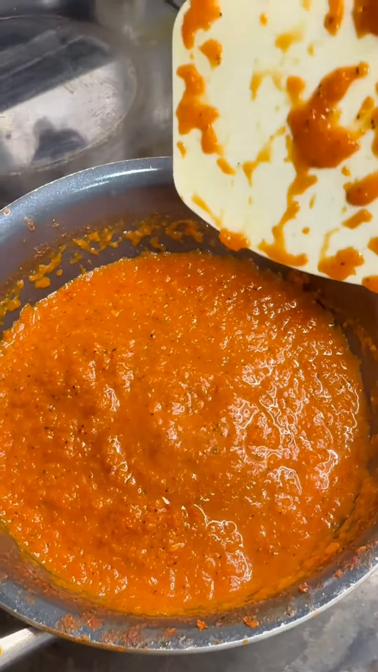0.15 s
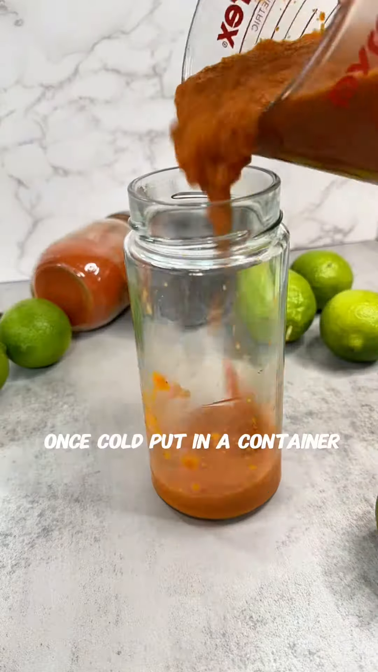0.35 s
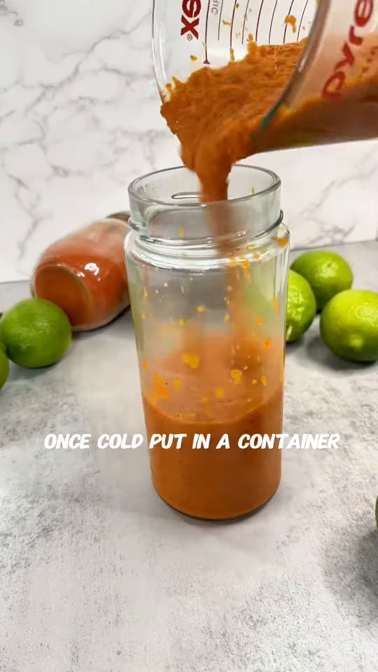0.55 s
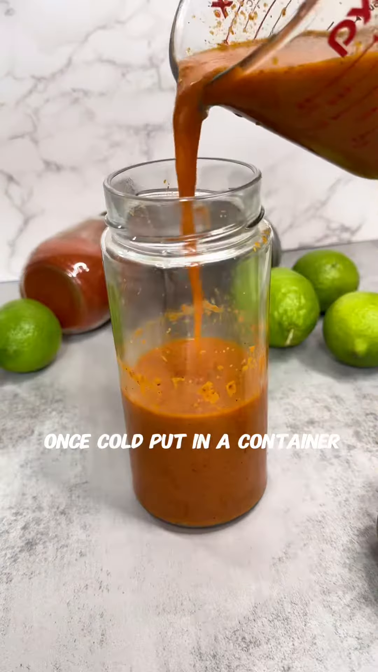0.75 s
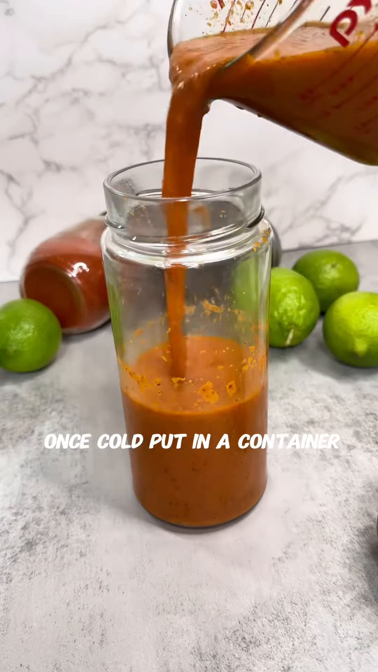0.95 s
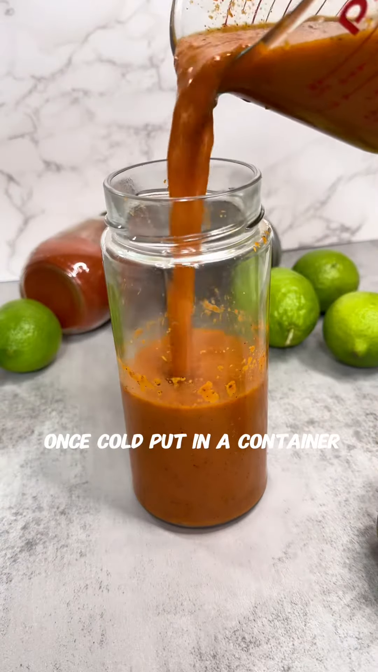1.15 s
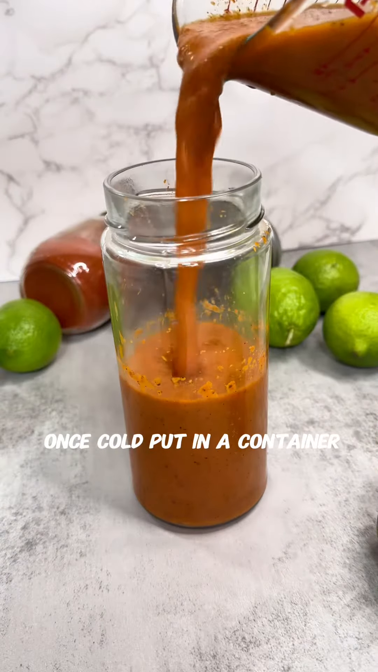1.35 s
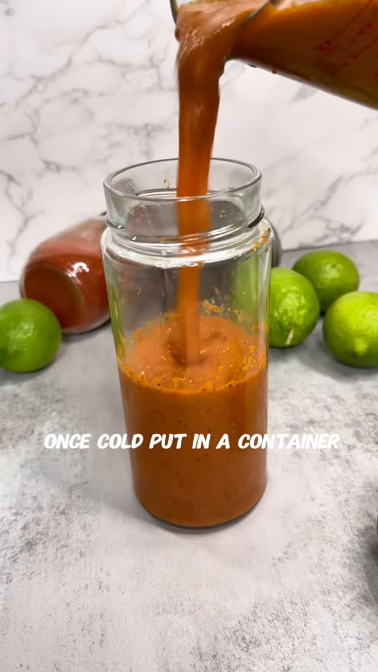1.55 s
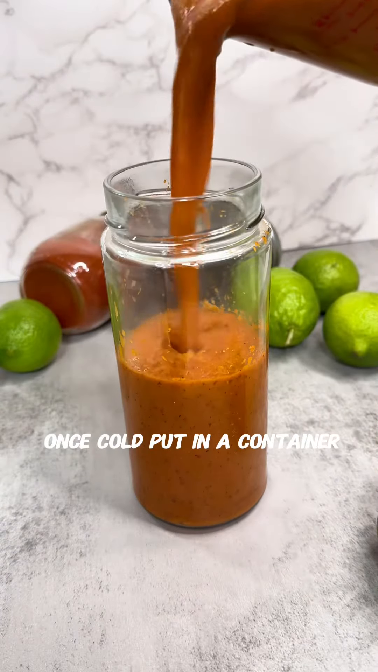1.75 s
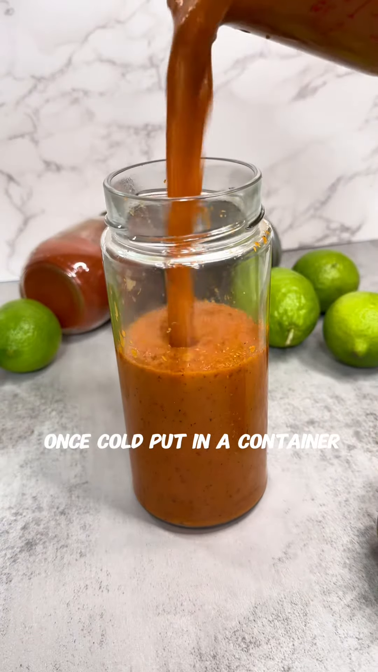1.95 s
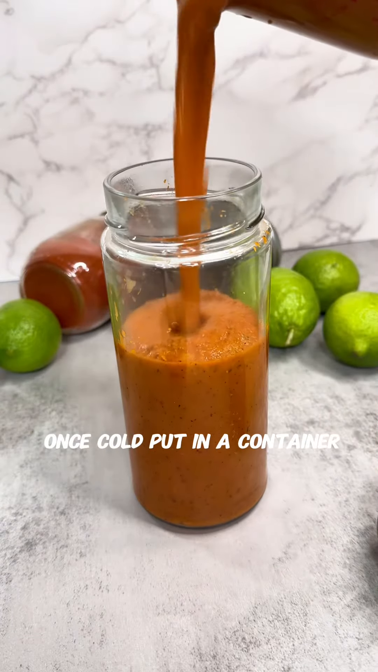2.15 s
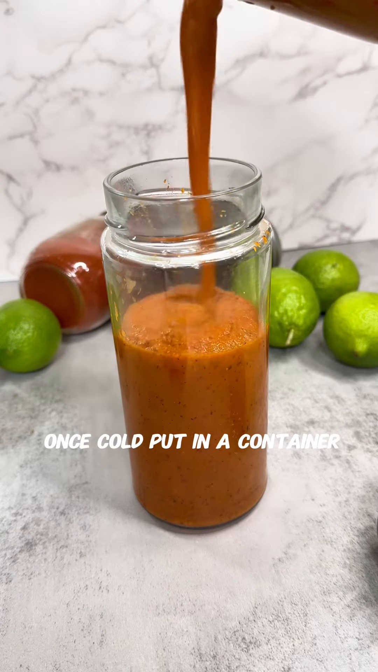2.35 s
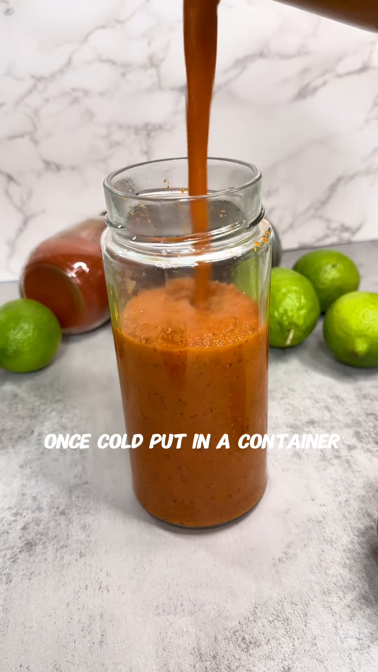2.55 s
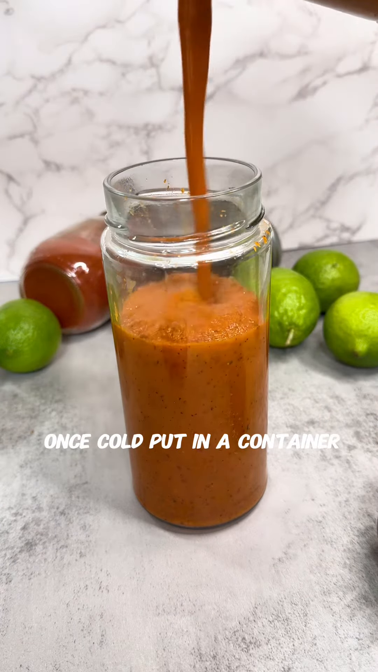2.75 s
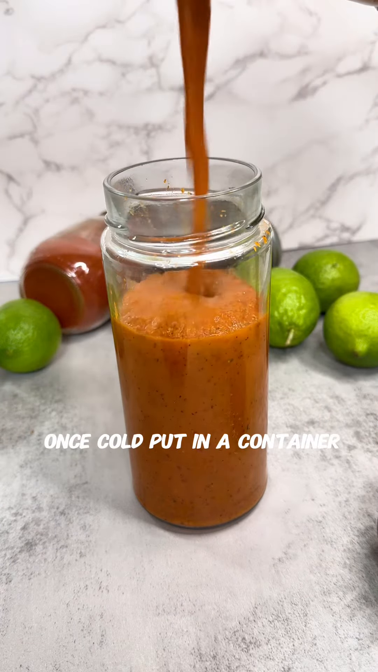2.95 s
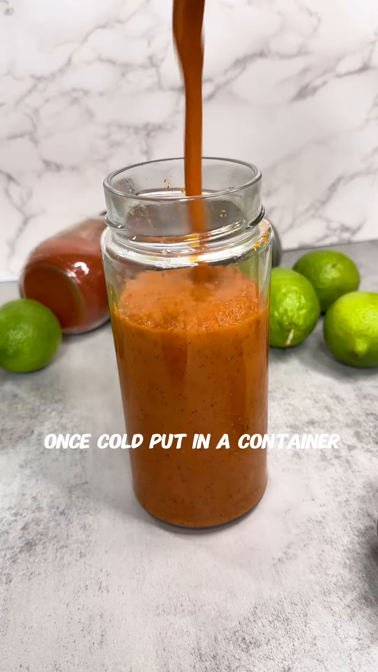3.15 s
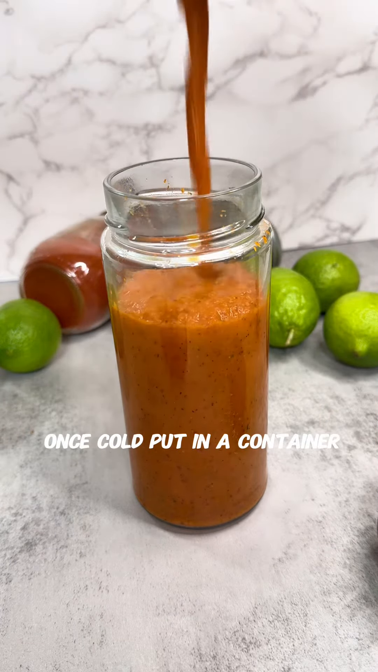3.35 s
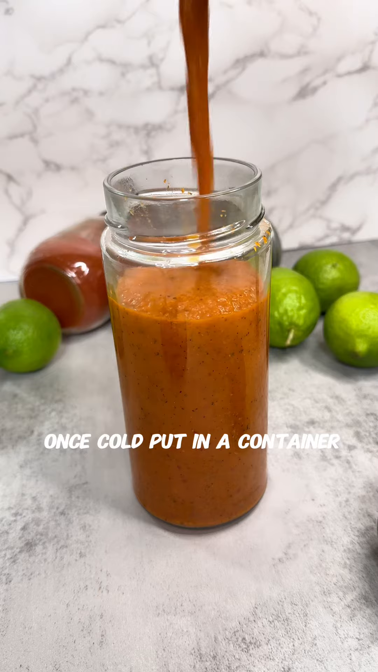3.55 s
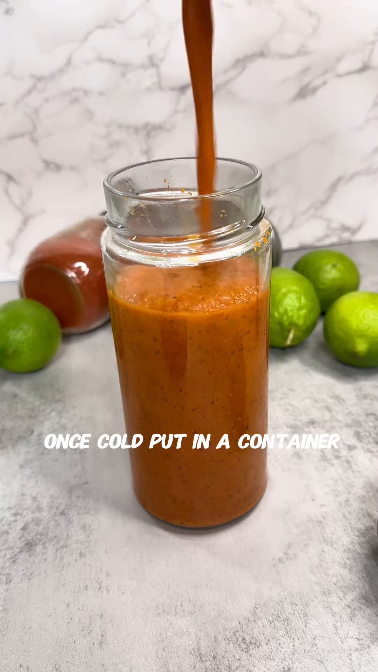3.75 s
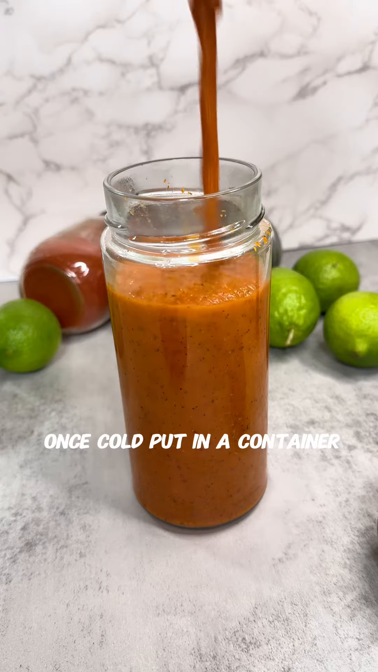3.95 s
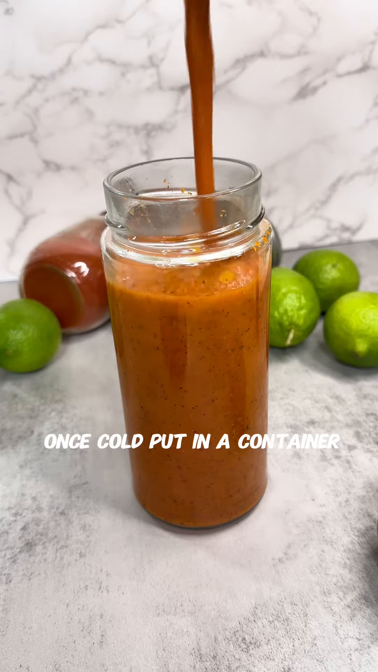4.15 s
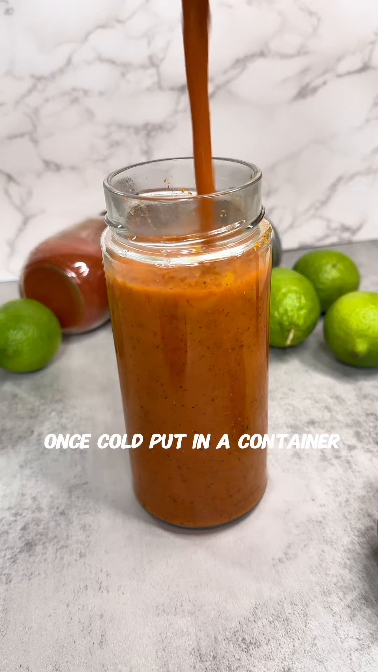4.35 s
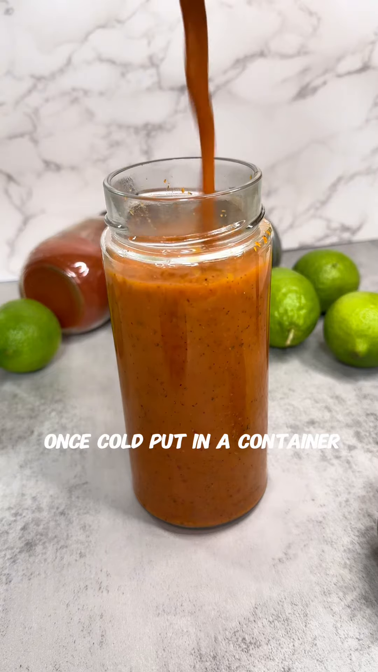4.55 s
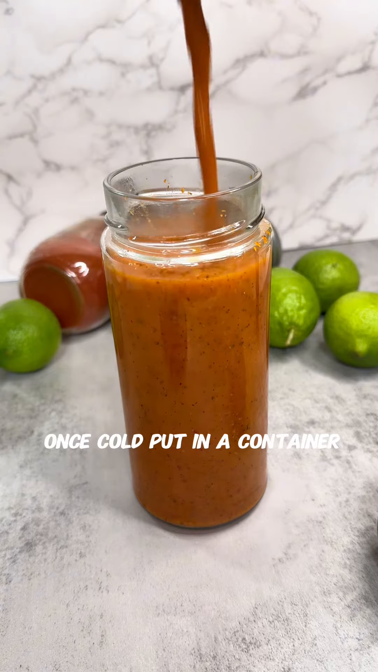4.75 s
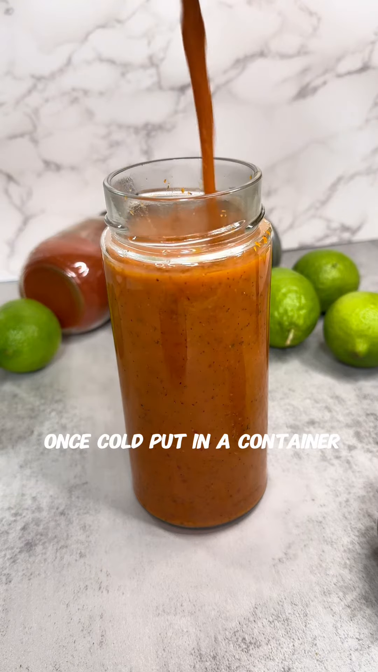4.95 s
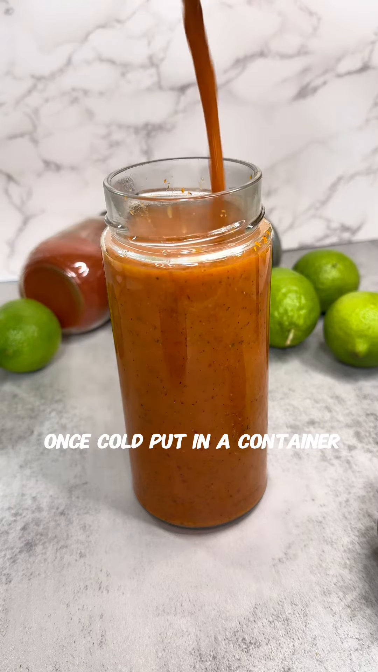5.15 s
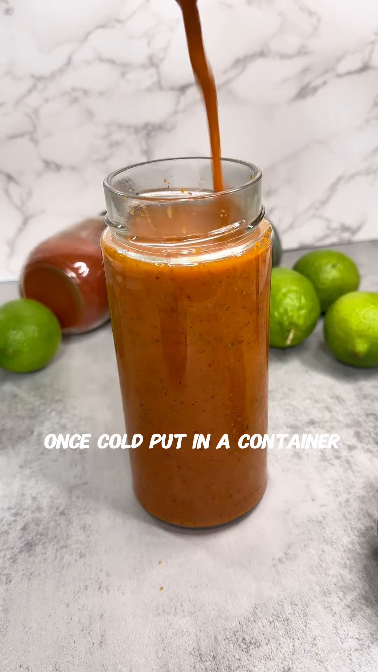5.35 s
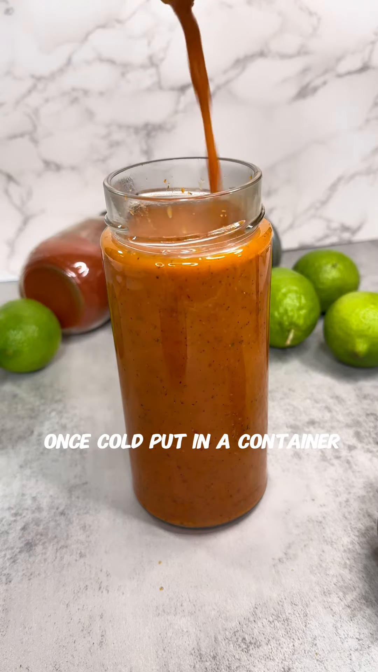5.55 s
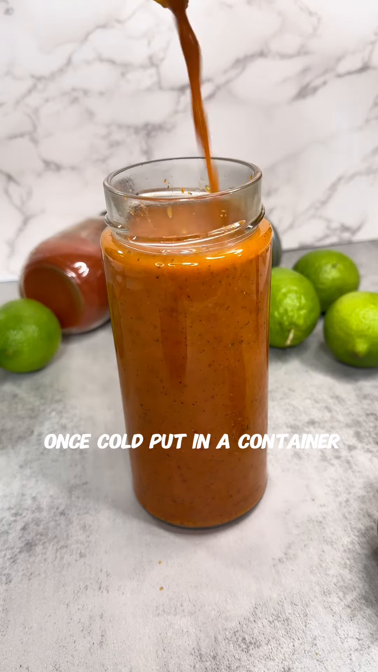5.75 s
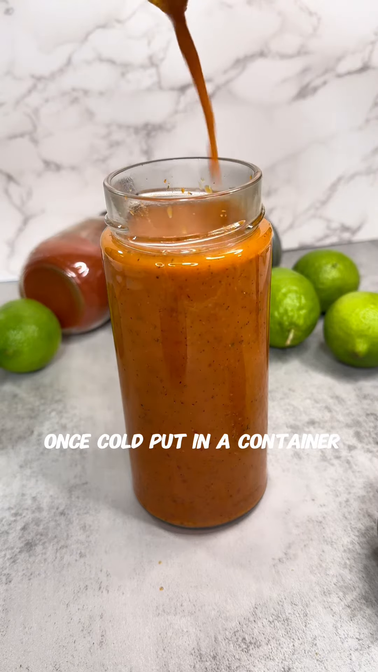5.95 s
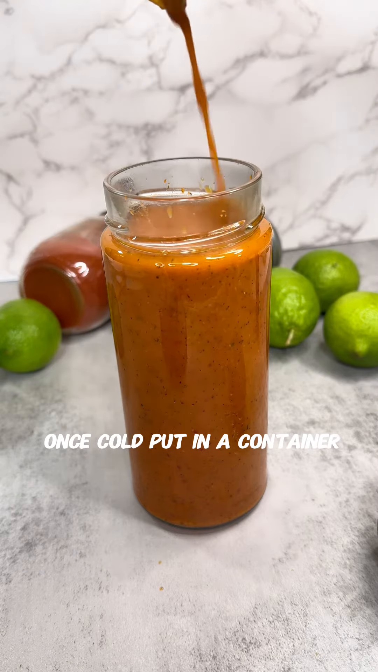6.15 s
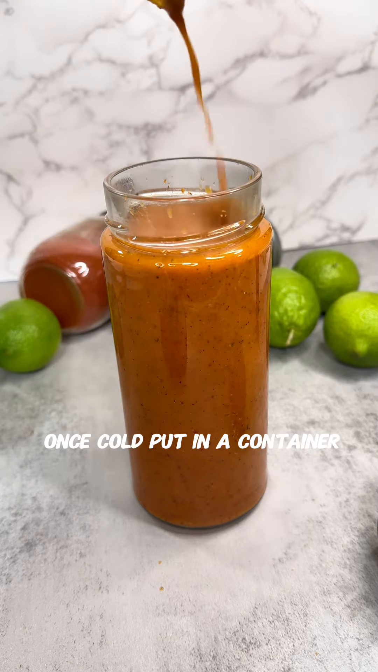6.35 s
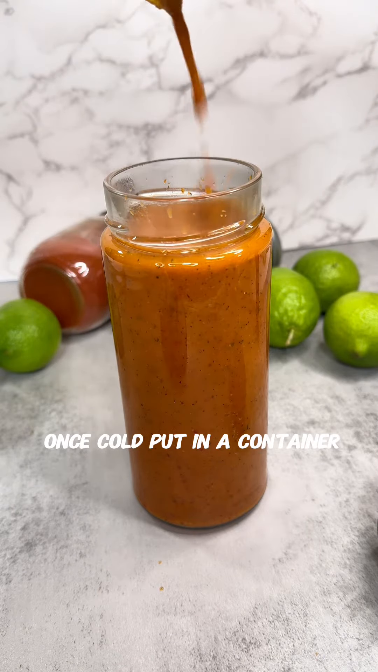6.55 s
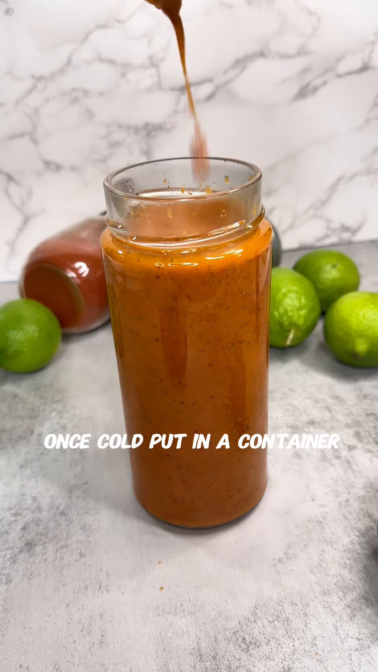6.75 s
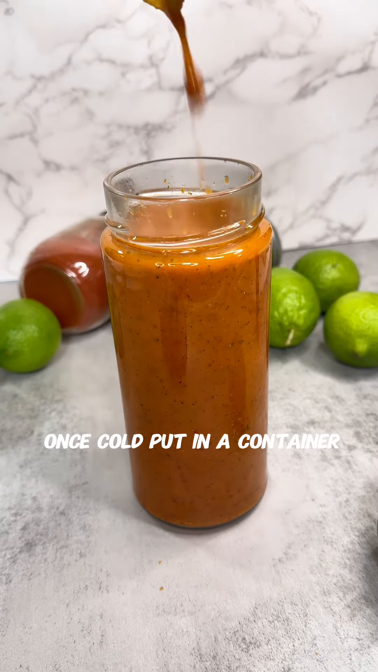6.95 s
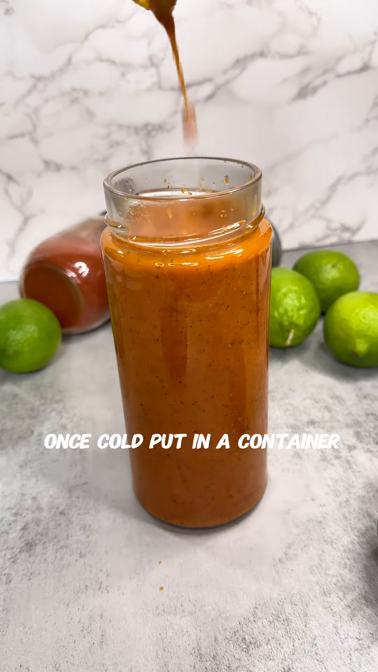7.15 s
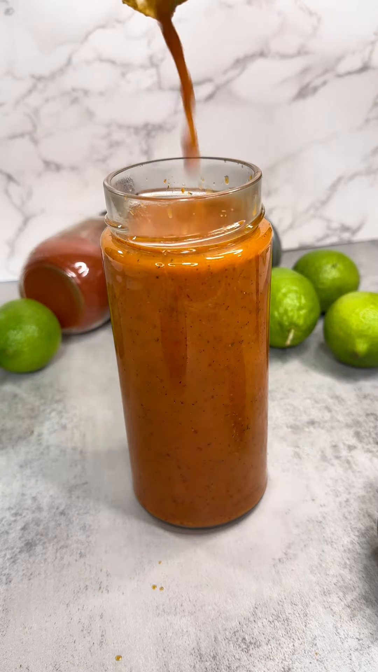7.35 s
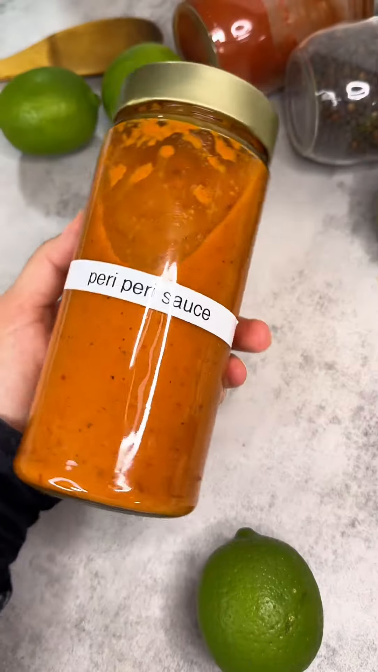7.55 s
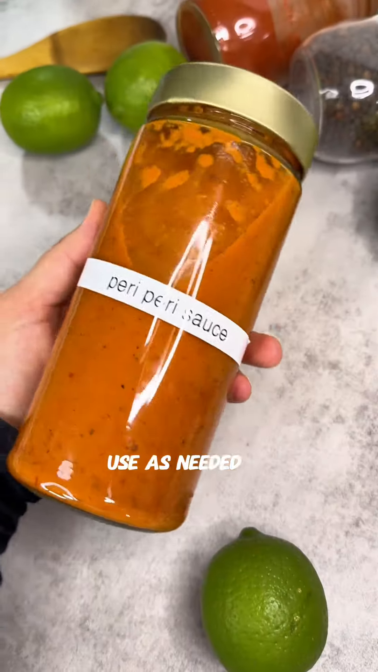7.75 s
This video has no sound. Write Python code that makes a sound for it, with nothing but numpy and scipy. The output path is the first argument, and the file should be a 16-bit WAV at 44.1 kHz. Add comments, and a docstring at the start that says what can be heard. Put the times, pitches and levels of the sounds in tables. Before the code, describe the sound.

After a brief low hum and silence, thick sauce glugs and plops into a glass jar up close, its hollow ring climbing until it thins to drips.

```python
"""Thick sauce filling a glass jar

Thick sauce pours from a jug into a tall jar, close to a two-port microphone, and thins to a few drips.
Trapped air plops as swelling tones, bubbles snap as noise bursts, and chirps slide upwards.
Moving resonances let the air left in the jar ring higher as it fills; fixed ones are the glass.
A low kitchen hum of tones and noise stops before the pour; a soft noise rumble follows it."""
import sys
import numpy as np
from scipy import signal
from scipy.fft import rfft, irfft, next_fast_len
from scipy.io import wavfile
from scipy.ndimage import uniform_filter1d

SR = 44100
rng = np.random.default_rng(int(sys.argv[2]) if len(sys.argv) > 2 else 0)


def store_pcm(level_fs):
    """Save levels as 16-bit WAV."""
    pcm = np.round(np.clip(level_fs, -1, 1) * 32767).astype(np.int16)
    wavfile.write(sys.argv[1], SR, np.atleast_2d(pcm).T)


N = 343671

# levels of the running stream:
# (time [s], deep stirring [relative dB], churn [relative dB], patter [relative dB], fizz [relative dB])
STREAM_LEVELS = [(0.93, -64, -74, -53.5, -65.5), (1.22, -79, -63, -51.5, -62.5), (1.4, -83, -67, -50, -74),
                 (1.81, -89, -58.5, -49.5, -59.5), (2.21, -75, -58.5, -53, -67),
                 (2.53, -85, -70.5, -56, -66.5), (2.96, -99, -81.5, -52.5, -69),
                 (3.24, -77, -60, -54, -68.5), (3.76, -63, -60.5, -51.5, -82.5),
                 (4.05, -64, -66, -61.5, -64), (4.32, -62.5, -63, -53.5, -63.5),
                 (4.68, -66, -69.5, -57, -82), (5.02, -62.5, -65, -61, -58),
                 (5.2, -71.5, -56, -57.5, -74.5), (5.43, -94, -79, -57, -59.5),
                 (5.75, -85.5, -72.5, -61.5, -73), (6.05, -83.5, -72, -56, -67.5),
                 (6.36, -86, -70, -97, -72.5), (6.55, -85.5, -66, -82, -81.5), (7.4, -107, -82, -87, -85)]
# resonances of the air above the sauce: (time [s], first [Hz], second [Hz])
AIR_COLUMN = [(.75, 693, 2850), (1.2, 624, 3047), (2.2, 947, 3047), (3.2, 1060, 3164), (3.8, 1220, 3240),
              (4.3, 1330, 3480), (4.9, 1720, 3780), (5.5, 1800, 4190), (6.0, 2100, 4570),
              (6.36, 2220, 4510), (6.5, 2800, 4520), (6.65, 3400, 4530), (7.4, 4060, 5600)]
# low edge of the splashing, set by the biggest pockets the stream can fold in: (time [s], frequency [Hz])
LOWEST_PITCH = [(1.15, 132), (1.45, 324), (2.2, 150), (2.5, 278), (2.92, 523), (3.02, 136), (5.14, 140),
                (5.3, 745), (5.6, 850), (5.76, 1100), (5.92, 730), (6.1, 1420), (6.34, 1900), (6.42, 2070),
                (6.55, 2900), (7.4, 3000)]
# the thinning stream whispering into the neck of the jar: (time [s], relative level [dB])
TRICKLE_LEVEL = [(5.2, -92), (5.5, -81), (5.8, -83), (6.0, -72), (6.2, -60), (6.33, -72.5), (6.38, -72),
                 (6.5, -85.5), (6.7, -99), (7.4, -103)]
# the larger air pockets folded in by the stream:
# (time [s], relative peak [dB], pitch at the peak [Hz], swell time [s])
AIR_POCKETS = [(.781, -34.5, 859, 0.0088), (.805, -31.5, 640, 0.0078), (.994, -24.5, 665, 0.0072),
               (1.014, -35.5, 678, 0.007), (1.05, -25, 610, 0.0039), (1.095, -32.5, 590, 0.0039),
               (1.142, -28, 560, 0.0025), (1.16, -28, 520, 0.0024), (1.189, -31, 628, 0.0048),
               (1.289, -39.5, 606, 0.0024), (1.378, -36, 745, 0.0099), (1.4, -32.5, 762, 0.0047),
               (1.555, -38.5, 780, 0.0054), (1.593, -36, 780, 0.0023), (1.623, -37, 802, 0.01),
               (1.657, -36.5, 783, 0.0088), (1.708, -23, 1080, 0.00089), (1.891, -36, 585, 0.0031),
               (1.91, -28, 636, 0.0062), (1.933, -23.5, 900, 0.002), (1.941, -28.5, 849, 0.0083),
               (1.987, -26, 906, 0.0025), (2.06, -27.5, 862, 0.0037), (2.073, -23.5, 870, 0.0011),
               (2.122, -27, 948, 0.0028), (2.14, -30, 908, 0.0047), (2.178, -37, 680, 0.0023),
               (2.245, -38.5, 586, 0.0029), (2.267, -24.5, 944, 0.0034), (2.327, -27.5, 928, 0.0038),
               (2.354, -32, 907, 0.0028), (2.457, -34.5, 986, 0.0024), (2.493, -26, 990, 0.0019),
               (2.528, -27.5, 931, 0.006), (2.661, -37.5, 1020, 0.0028), (2.696, -37.5, 970, 0.0032),
               (2.718, -29, 914, 0.0032), (2.753, -23, 975, 0.0031), (2.767, -25, 1042, 0.0031),
               (2.78, -26, 1090, 0.0014), (2.841, -27, 1004, 0.0024), (2.865, -38, 1000, 0.0027),
               (2.881, -35.5, 930, 0.0021), (2.907, -33, 970, 0.0028), (2.95, -19, 1000, 0.0022),
               (3.035, -26, 990, 0.003), (3.087, -39.5, 634, 0.0088), (3.144, -32.5, 910, 0.0061),
               (3.247, -23.5, 996, 0.0028), (3.269, -21, 1214, 0.0012), (3.34, -19, 1067, 0.0019),
               (3.362, -35, 886, 0.0035), (3.411, -38.5, 614, 0.0017), (3.483, -21.5, 1105, .0014),
               (3.512, -27, 930, 0.0028), (3.523, -20, 1220, 0.002), (3.552, -28.5, 1325, .002),
               (3.561, -23, 1110, 0.0013), (3.64, -33.5, 902, 0.0076), (3.668, -16.5, 1235, 0.0013),
               (3.696, -22.5, 1130, 0.0012), (3.719, -21.5, 1325, 0.002), (3.787, -33, 1360, 0.0024),
               (3.824, -29.5, 1280, 0.0017), (3.86, -24, 1034, 0.0016), (3.888, -26.5, 1110, 0.0015),
               (3.955, -30, 1310, 0.0019), (3.962, -41.5, 613, 0.0072), (4.157, -28.5, 1413, 0.0034),
               (4.245, -29.5, 1010, 0.0011), (4.329, -32, 1510, 0.0019), (4.346, -39, 530, 0.0028),
               (4.454, -37.5, 985, 0.0028), (4.508, -36, 1200, 0.001), (4.579, -44, 880, 0.0021),
               (4.629, -40.5, 1700, 0.0028), (4.668, -38, 1360, 0.0015), (4.686, -30, 1320, 0.00059),
               (4.79, -39, 890, 0.0014), (4.861, -34.5, 915, 0.0012), (4.949, -38.5, 940, 0.00096),
               (4.986, -41.5, 920, .0013), (5.061, -35.5, 955, 0.0016), (5.117, -27, 1070, 0.00043),
               (5.392, -41, 942, 0.0046), (5.855, -40.5, 1775, 0.0022), (5.931, -39.5, 950, 0.0027),
               (5.971, -34, 2124, 0.0026), (6.019, -36.5, 2000, 0.0015), (6.112, -45, 1960, .002),
               (6.636, -44.5, 1550, 0.003), (6.941, -44, 874, 0.005)]
# thick lumps of sauce landing with a thud: (time [s], relative level [dB])
LUMP_HITS = [(1.097, -44.5), (1.145, -42.5), (1.158, -45.5), (1.385, -48.5), (1.707, -35.5), (1.914, -41.5),
             (2.076, -45.5), (2.178, -44), (3.037, -33), (3.088, -33.5), (3.483, -34), (3.525, -39),
             (3.887, -41.5), (4.159, -35.5), (4.244, -38), (4.329, -36.5), (4.686, -43.5), (4.791, -37.5),
             (5.063, -41.5)]
# the louder bubbles snapping open:
# (time [s], relative snap [dB], snap colour [Hz], relative jar ring [dB])
BUBBLE_SNAPS = [(0.746, -51, 9700, -61), (.782, -24.5, 9400, -38), (0.827, -35, 14700, -46.5),
                (.918, -44.5, 10900, -71), (.993, -21, 10560, -29.5), (1.094, -43, 7940, -54),
                (1.114, -45.5, 7800, -47), (1.142, -33.5, 8000, -43), (1.201, -31, 7430, -36),
                (1.314, -42, 13600, -51), (1.332, -45, 11300, -42), (1.378, -32.5, 6400, -32.5),
                (1.485, -36, 8350, -60), (1.564, -29, 10500, -43), (1.5926, -34, 10000, -50),
                (1.627, -16.5, 9980, -31), (1.718, -34, 5800, -55), (1.819, -27, 11660, -27.5),
                (1.867, -31, 13700, -42), (1.929, -47, 13700, -46), (2.074, -33.5, 12500, -34),
                (2.085, -40.5, 13500, -48), (2.353, -44.5, 11900, -48), (2.418, -41.5, 7800, -41.5),
                (2.432, -35.5, 15300, -39.5), (2.456, -46, 8460, -41.5), (2.596, -29, 11430, -57),
                (2.661, -47, 8600, -47), (2.708, -38.5, 8400, -49.5), (2.816, -49, 8440, -45),
                (3.036, -38, 11100, -67), (3.059, -45.5, 11200, -58), (3.0873, -38.5, 13600, -65),
                (3.109, -39.5, 14100, -40), (3.266, -38, 13800, -40.5), (3.524, -30.5, 10760, -44),
                (3.57, -43, 14700, -67), (3.624, -37.5, 8900, -65), (3.656, -40.5, 9100, -60),
                (3.712, -34, 12400, -63), (3.765, -33, 12700, -65), (3.787, -29, 11640, -67),
                (3.956, -31, 10170, -44), (3.974, -46, 10800, -67), (4.01, -36, 6770, -46.5),
                (4.087, -42, 13900, -52), (4.159, -29, 7800, -28.5), (4.331, -40.5, 14400, -63),
                (4.395, -33, 6630, -41.5), (4.55, -37, 7400, -49), (4.628, -43, 10330, -52),
                (4.686, -75, 8650, -42.5), (4.788, -39.5, 8670, -31), (4.863, -40, 9900, -34.5),
                (4.909, -35.5, 8400, -48), (4.949, -41, 13700, -38), (5.013, -44.5, 11300, -44.5),
                (5.061, -43.5, 11200, -43), (5.19, -40.5, 7660, -54), (5.312, -68, 10500, -36.5),
                (5.392, -43.5, 12500, -35), (5.512, -48, 13600, -33), (5.54, -39.5, 8600, -51),
                (5.557, -46.5, 10600, -52), (5.601, -40, 14100, -44), (5.662, -38, 9400, -44),
                (5.695, -48, 14100, -59), (5.75, -48, 11000, -78), (5.814, -58, 8800, -41.5),
                (5.932, -37, 11130, -34), (5.971, -46.5, 14600, -57.5), (6.073, -40, 8350, -41),
                (6.11, -32.5, 9960, -46), (6.311, -54, 11400, -71), (6.356, -35.5, 11150, -38.5),
                (6.49, -46, 7900, -79), (6.532, -48.5, 13100, -69), (6.603, -50.5, 14340, -77),
                (6.637, -43.5, 9230, -51.5), (6.74, -49.5, 13500, -79), (6.843, -47, 8660, -77),
                (6.893, -51, 9000, -69), (6.941, -59, 10600, -58), (7.064, -48, 13500, -64),
                (7.089, -51, 11560, -68.5), (7.123, -55, 13400, -77), (7.227, -42, 11370, -63.5),
                (7.439, -49.5, 4800, -56), (7.463, -57.5, 4500, -64)]
# bubbles whose pitch slides up as their hole widens:
# (time [s], relative peak [dB], middle pitch [Hz], length [s], climb [octaves])
BUBBLE_CHIRPS = [(0.801, -40, 2060, 0.0089, 0.99), (0.855, -46, 1680, 0.0083, 1.1),
                 (1.184, -35.5, 1330, 0.016, 1.16), (1.306, -52, 2550, .014, 1),
                 (1.321, -44, 2750, .014, 0.36), (1.4, -45, 3380, 0.02, 0.96), (1.558, -50, 1800, .012, 1),
                 (1.576, -41, 2280, 0.018, 1.3), (1.703, -27, 1273, 0.014, 0.75),
                 (1.955, -48, 1860, 0.016, 0.76), (1.97, -46, 4460, .012, 0.63),
                 (2.064, -39, 2650, 0.021, 1.1), (2.591, -43.5, 4310, 0.0063, 0.68),
                 (2.737, -47.5, 1916, 0.019, 0.77), (2.806, -51, 3760, 0.011, 1.4),
                 (2.904, -52, 2790, 0.012, 1.2), (3.053, -44, 1520, 0.014, 0.82),
                 (3.261, -43.5, 6150, 0.013, 0.89), (3.265, -44, 2860, 0.022, 1.1),
                 (3.337, -44.5, 3060, 0.015, 0.46), (3.368, -48.5, 2870, 0.028, .9),
                 (3.667, -32.5, 1366, 0.013, 1.14), (3.681, -45.5, 3050, 0.013, 0.62),
                 (3.696, -51, 1230, 0.025, 0.7), (3.821, -50.5, 3180, 0.013, 0.73),
                 (3.857, -27.5, 1436, 0.0077, 0.76), (3.985, -33, 1010, 0.015, 0.64),
                 (4.314, -49, 3380, 0.01, .9), (4.366, -29.5, 1454, 0.015, 0.67),
                 (4.748, -46, 3230, 0.021, 1.4), (4.873, -35.5, 1824, 0.0095, 0.63),
                 (4.979, -40, 3690, 0.0097, 0.8), (5.299, -36.5, 1356, 0.014, 0.66),
                 (5.305, -33, 2135, 0.014, 1.4), (5.34, -44.5, 2550, 0.011, 1.17),
                 (5.35, -47, 3970, 0.0098, 0.82), (5.456, -40.5, 1720, .014, 0.3),
                 (5.508, -39, 3700, 0.014, 1.13), (5.515, -37.5, 2230, 0.019, 1.4),
                 (5.597, -32.5, 1782, 0.011, 0.88), (5.598, -45.5, 4890, 0.0095, 0.35),
                 (5.873, -51.5, 3900, 0.0097, 0.96), (5.935, -39, 2240, 0.013, 0.83),
                 (6.016, -36, 2200, .018, 1.37), (6.035, -56, 3920, 0.013, 0.93),
                 (6.051, -48, 2600, 0.009, 1.3), (6.152, -48.5, 3140, 0.016, 1.4),
                 (6.192, -52.5, 4490, 0.01, 0.69), (6.601, -53.5, 3830, 0.0091, 1.2),
                 (6.699, -45, 4320, 0.01, 1.34), (6.925, -52.5, 4110, 0.01, 0.62),
                 (7.041, -53.5, 3670, 0.025, 1.0), (7.226, -50, 5860, 0.0085, 1.01)]
# spectrum of the deep stirring: (frequency [Hz], relative density [dB per Hz])
DEEP_SPECTRUM = [(20, -16.5), (60, -3.5), (130, -1.5), (200, -1.5), (350, -8.5), (900, -30.5),
                 (3000, -52.5)]
# spectrum of the churned sauce: (frequency [Hz], relative density [dB per Hz])
CHURN_SPECTRUM = [(30, -50), (90, -37), (150, -8.5), (220, -7), (330, 6), (420, -4.5), (620, 0.5),
                  (760, -7.5), (930, -2), (1150, 5.5), (1500, -7), (3000, -43.5)]
# spectrum of the fizz: (frequency [Hz], relative density [dB per Hz])
FIZZ_SPECTRUM = [(2000, -28.5), (3000, -19), (5000, -10), (6500, -9), (8500, -0.5), (9800, -2), (11200, 0),
                 (13000, 5.5), (15000, 2.5), (16500, 3)]
# first splash straight from the sauce surface: (frequency [Hz], relative density [dB per Hz])
SPLAT_SPECTRUM = [(100, -11.5), (400, -37.5), (1000, 10), (2000, 0.5), (3500, 2), (5000, -2), (6500, -4.5),
                  (9000, -0.5)]
# the stream sliding into the surface: (frequency [Hz], relative density [dB per Hz])
SLIDE_SPECTRUM = [(800, -23.5), (1500, -11), (2000, -4.5), (2300, 1.5), (2650, -10.5), (5000, -28)]
# standing waves across the jar: (frequency [Hz], width [Hz], relative level [dB])
ACROSS_MODES = [(4350, 200, -8), (5940, 79, -12.5), (6460, 160, -10), (7490, 120, -22.5), (8080, 170, -14),
                (8790, 210, -13.5), (10550, 610, -12.5), (11240, 230, -18), (15500, 400, -21.5)]
# the glass wall, damped by the sauce: (frequency [Hz], relative level [dB], t60 [s])
GLASS_MODES = [(1890, -29, .14), (2205, -28, .2)]
# microphone ports: (frequency [Hz], left minus right [dB], left lead [rad])
PORT_DIFFERENCES = [(100, 0, 0), (500, 0, .7), (730, 1, .8), (880, 13, 1.1), (1020, 6, 1.9), (1200, 1, 3.4),
                    (1500, 12, 5.2), (2000, -2, 6.5), (2150, 5, 9.2), (2400, 9, 12), (2800, 6, 15.7),
                    (3300, 9, 19.1), (3800, 3, 18.4), (7800, 3, 19.1), (9600, 0, 15.7), (12600, 0, 9.4),
                    (16000, 0, 2.4)]
# kitchen reflections: (frequency [Hz], gain [dB])
WALL_GAINS = [(40, -22), (150, -8.5), (400, -4.5), (900, -7.5), (1400, -9), (2000, -5.5), (4000, -6.5),
              (8000, -6), (15000, -16.5)]
# tones of the hum before the pour: (frequency [Hz], relative rms level [dB])
HUM_TONES = [(53.8, -42.5), (118.4, -45.5), (242.2, -54), (554.5, -62)]
# rush in the hum: (frequency [Hz], relative density [dB per Hz])
HUM_SPECTRUM = [(26, -34.5), (45, -8.5), (62, -7), (81, -21), (120, -9), (148, -15), (231, -11),
                (336, -20.5), (939, -25), (1110, -31.5), (1890, -36.5), (12000, -75.5), (15600, -117),
                (22000, -120)]
# rumble after the pour: (frequency [Hz], relative density [dB per Hz])
RUMBLE_SPECTRUM = [(26, -41), (45, -3), (123, 1.5), (159, -7.5), (196, -0.5), (306, -12.5), (455, -11),
                   (488, -16), (536, -17.5), (1810, -39.5), (1940, -39), (12000, -60), (15600, -104),
                   (22000, -120)]
# width of the background: (frequency [Hz], side minus mid [dB])
BACKGROUND_WIDTH = [(30, -34), (70, -21.5), (150, -21), (400, -1), (1500, -3)]

TIME = np.arange(N) / SR
SIZE = next_fast_len(N + SR)
FREQS = np.fft.rfftfreq(SIZE, 1 / SR) + 1e-3   # kept off zero for the logarithm
POUR_FROM_S, POUR_TO_S = .743, 7.46
CHURN_ENDS_S = 5.24   # the stream is then too thin to fold in large pockets
WOBBLE_HZ = 670   # the thin stream only rocks the surface, dully
GURGLES_PER_S, GURGLE_SPREAD_DB = 420, 12
BIGGEST_BUBBLE_HZ = 602   # the lowest gurgle while the stream still plunges
# gurgle range in multiples of the first resonance; the low end holds for the thin trickle
SMALL_LOW, SMALL_HIGH = 0.54, 1.3
BLIPS_PER_S, BLIP_CYCLES, BLIP_DB = 80, 2.2, -3.5   # the level is relative to the patter
BLIPS_END_S = 4.1   # middling pockets need depth to form
SNAP_S = 0.0029   # decay time shared by every snap
SNAP_UPPER_DB = -11   # share of the second resonance in the ring of a snap
SECOND_WIDTH_HZ = 75   # starting width of the second resonance
WIDENING = .8   # a shorter column loses more at the mouth: width follows this power of the first pitch
THREAD_DB = -69   # noise drive of the last thread of sauce on the glass
KITCHEN_T60_S = 0.29
HUM_DB, RUMBLE_DB = -46, -56.5   # rms of the rush and the rumble
CUTOFF_HZ = 16000


def from_db(db):
    """Decibels to gain."""
    return 10 ** (np.asarray(db) / 20)


def rms_one(x):
    """Scale to an rms of one."""
    return x / np.sqrt(np.mean(x ** 2) + 1e-20)


def in_time(rows):
    """The columns of a curve at every sample."""
    s, *columns = np.transpose(rows)
    return [np.interp(TIME, s, c) for c in columns]


def between(start, end, fade):
    """One from start to end, with short ramps inside."""
    return np.clip((TIME - start) / fade, 0, 1) * np.clip((end - TIME) / fade, 0, 1)


def add(track, s, sound):
    """Mix a short sound into a track at a time in seconds."""
    i = int(np.clip(s * SR, 0, N - 1))
    track[i:i + len(sound)] += sound[:N - i]


def gains(points):
    """A spectrum as a gain at every frequency."""
    hz, db = np.transpose(points)
    return from_db(np.interp(np.log(FREQS), np.log(hz), db))


def colour(x, points):
    """Causal (minimum-phase) filter with the given spectrum; white noise keeps its power."""
    cepstrum = irfft(np.log(rms_one(gains(points))), SIZE)
    # folding the cepstrum forward in time makes the phase minimal
    cepstrum[1:SIZE // 2] *= 2
    cepstrum[SIZE // 2 + 1:] = 0
    return irfft(rfft(x, SIZE) * np.exp(rfft(cepstrum)), SIZE)[..., :N]


def resonate(x, hz, width_hz, state=(0., 0.)):
    """One resonance that keeps the power of white noise; gives the sound and the filter state."""
    r = np.exp(-np.pi * width_hz / SR)
    b = np.sqrt((1 - r * r) / 2) * np.array([1, 0, -1])
    a = [1, -2 * r * np.cos(2 * np.pi * hz / SR), r * r]
    return signal.lfilter(b, a, x + 1e-18, zi=state)


def glide(x, hz, width_hz, size=512):
    """A resonance whose centre and width move, block by block."""
    out, state, width_hz = np.zeros(N), np.zeros(2), width_hz * np.ones(N)
    for i in range(0, N, size):
        out[i:i + size], state = resonate(x[i:i + size], hz[i], width_hz[i], state)
    return out


def grains(per_s, spread_db):
    """Random clicks of uneven size; rms 1."""
    sizes = from_db(spread_db * np.minimum(rng.exponential(1, N), 3)) * rng.choice([-1, 1], N)
    return rms_one(sizes * (rng.random(N) < per_s / SR))


def burst(length, onset_s=0.00013):
    """A spray of noise that dies away; it has the energy of a unit sound of that length."""
    t = TIME[:int(6 * length * SR) + 8]
    spray = rng.standard_normal(len(t)) * np.exp(-t / length) * (1 - np.exp(-t / onset_s))
    return rms_one(spray) * np.sqrt(length * SR / len(t))


def bubbles(per_s, low_hz, high_hz, cycles, rise, spread_db):
    """A swarm of small bubbles, each a short rising tone with a pitch and size of its own; rms 1."""
    out, low_hz, high_hz = np.zeros(N), low_hz * np.ones(N), high_hz * np.ones(N)
    for k, (when, place, size, turn) in enumerate(rng.random((int(per_s * N / SR), 4))):
        s = (k + 2 * when) / per_s
        i = min(int(s * SR), N - 1)
        hz = low_hz[i] * (high_hz[i] / low_hz[i]) ** place
        # age counts swell times: the tone peaks at one
        age = TIME[:int(7 * cycles * SR / hz)] * hz / cycles
        phase = 2 * np.pi * (turn + cycles * age * (1 + rise * (age / 2 - 1)))
        level = from_db(spread_db * size ** 2) * np.sqrt(hz)
        add(out, s, level * age * np.exp(-age) * np.sin(phase))
    return rms_one(out)


def stream(stir_db, fold_db, slosh_db, gurgle_db, wash_db, splatter_db, spray_db):
    """The stream stirs and churns the sauce, gurgles, washes through the air, splatters and fizzes."""
    deep_db, churn_db, patter_db, fizz_db = in_time(STREAM_LEVELS)
    air_hz = in_time(AIR_COLUMN)[0]
    plunging = between(-1, CHURN_ENDS_S, 0.15)

    deep = from_db(deep_db + stir_db) * colour(grains(per_s=700, spread_db=0.0), DEEP_SPECTRUM)
    pockets = bubbles(200, 170, 620, cycles=1.96, rise=0.041, spread_db=11.5)
    churn = from_db(churn_db + fold_db) * pockets * plunging
    slosh = from_db(churn_db + slosh_db) * colour(grains(per_s=1800, spread_db=0.0), CHURN_SPECTRUM)
    wobble = signal.sosfilt(signal.butter(2, WOBBLE_HZ, fs=SR, output="sos"), slosh)
    slosh = plunging * slosh + (1 - plunging) * wobble

    lowest_hz = plunging * BIGGEST_BUBBLE_HZ + (1 - plunging) * SMALL_LOW * air_hz
    gurgle = bubbles(GURGLES_PER_S, lowest_hz, SMALL_HIGH * air_hz,
                     cycles=1.5, rise=.035, spread_db=GURGLE_SPREAD_DB)
    gurgle = from_db(patter_db + gurgle_db) * gurgle

    wash = from_db(patter_db + wash_db) * grains(per_s=680, spread_db=5.5)
    wash = jar_air(wash, width_hz=41, second_db=-34.0, direct_db=-14.5)

    spray = burst(0.0015)
    droplets = from_db(patter_db + splatter_db) * grains(per_s=56, spread_db=8.5)
    splatter = jar_air(droplets, width_hz=370, second_db=-1.0, direct_db=-0.5)
    # each droplet smears into a wet spray
    splatter = signal.fftconvolve(splatter, spray / np.linalg.norm(spray))[:N]

    tiny = bubbles(45, 4500, 21000, cycles=0.93, rise=0.03, spread_db=12.5)
    # each one breaks into a short spray
    tiny = rms_one(signal.fftconvolve(tiny, burst(0.0022))[:N])
    fizz = from_db(fizz_db + spray_db) * across(colour(tiny, FIZZ_SPECTRUM), direct_db=7.0)

    splashing = above_lowest(churn + gurgle + wash + splatter)
    return (deep + slosh + splashing + fizz) * between(POUR_FROM_S, POUR_TO_S, 0.0022)


def slide(hiss_db, seethe_db, ring_db):
    """The stream slides in with a wet hiss and seething bubbles, which ring the upper resonance."""
    patter_db = in_time(STREAM_LEVELS)[2]
    hiss = from_db(hiss_db) * colour(grains(per_s=1700, spread_db=3.0), SLIDE_SPECTRUM)
    seethe = from_db(seethe_db) * bubbles(130, 1200, 3400, cycles=2.2, rise=0.05, spread_db=16.5)
    ring = from_db(ring_db) * upper_air(seethe)
    return from_db(patter_db) * (hiss + seethe + ring) * between(POUR_FROM_S, POUR_TO_S, 0.0044)


def trickle(width_hz):
    """The thin stream keeps the neck air humming: a soft band of noise that climbs as the jar fills."""
    level_db, = in_time(TRICKLE_LEVEL)
    air_hz = in_time(AIR_COLUMN)[0]
    hum = glide(grains(per_s=2100, spread_db=-0.5), air_hz, width_hz)
    hum = rms_one(glide(hum, air_hz, width_hz))
    return from_db(level_db) * hum * between(TRICKLE_LEVEL[0][0], POUR_TO_S, 0.02)


def plops(level_db, thud_db, tick_db, ring_db, upper_db, attack, damping, rise):
    """Each air pocket ticks open, swells and dies, rising a little; harder churn thuds shut louder."""
    tones, thuds, ticks = np.zeros((3, N))
    for s, db, hz, swell in AIR_POCKETS:
        age = TIME[:int(6 * swell * SR)] / swell
        phase = 2 * np.pi * np.cumsum(hz * (1 + rise * np.tanh((age - 1) / 2))) / SR
        # thick sauce damps the tone faster and faster
        envelope = age ** attack * np.exp(attack / damping * (1 - age ** damping))
        add(tones, s, from_db(db) * envelope * np.sin(phase))
        add(thuds, s + swell / 2, burst(0.021))
        add(ticks, s, from_db(db + tick_db) * burst(0.00065))
    churn_db = in_time(STREAM_LEVELS)[1]
    loudness = np.std(tones)
    first = rms_one(glide(tones, in_time(AIR_COLUMN)[0], width_hz=45)) * loudness
    second = rms_one(upper_air(ticks)) * loudness
    ring = from_db(ring_db) * first + from_db(upper_db) * second
    wet = across(colour(ticks, FIZZ_SPECTRUM), direct_db=-13.0)
    wet = wet + from_db(-1.0) * jar_air(ticks, width_hz=150, second_db=-0.5, direct_db=-1.5)
    thud = from_db(churn_db + thud_db) * colour(thuds, CHURN_SPECTRUM)
    return from_db(level_db) * tones + ring + above_lowest(thud + wet)


def blips(low, high, spread_db):
    """Middling air pockets gurgle between the big plops, pitched around the jar's first resonance."""
    patter_db, air_hz = in_time(STREAM_LEVELS)[2], in_time(AIR_COLUMN)[0]
    swarm = bubbles(BLIPS_PER_S, low * air_hz, high * air_hz,
                    cycles=BLIP_CYCLES, rise=0.02, spread_db=spread_db)
    level = from_db(patter_db + BLIP_DB)
    return level * above_lowest(swarm) * between(POUR_FROM_S, BLIPS_END_S, 0.1)


def lumps(level_db, length_s):
    """A thick lump lands with a short, dull thud of coloured noise."""
    out = np.zeros(N)
    for s, db in LUMP_HITS:
        add(out, s, from_db(db + level_db) * burst(length_s))
    return colour(out, CHURN_SPECTRUM)


def pops(snap_db, ring_db, whistle_db, whistle_width_hz):
    """A film tears with a bright snap of its own colour and knocks on the air in the jar."""
    snaps, knocks = np.zeros((2, N))
    for s, db, hz, jar_db in BUBBLE_SNAPS:
        tear = burst(SNAP_S)
        whistle = resonate(tear, min(hz, CUTOFF_HZ), whistle_width_hz)[0]
        add(snaps, s, from_db(db) * (tear + from_db(whistle_db) * whistle))
        add(knocks, s, from_db(jar_db) * burst(0.0026))
    snap = across(colour(snaps, FIZZ_SPECTRUM), direct_db=-1.5)
    ring = jar_air(knocks, width_hz=240, second_db=SNAP_UPPER_DB, direct_db=-4.5)
    return from_db(snap_db) * snap + from_db(ring_db) * above_lowest(ring)


def squeaks(level_db, rough, ring_db):
    """Bubbles opening at the surface chirp upwards, slightly ragged, and ring the second resonance."""
    out = np.zeros(N)
    for s, db, hz, length, octaves in BUBBLE_CHIRPS:
        n = int(length * SR)
        bend = 2 ** (octaves * np.linspace(-.5, .5, n))
        flutter = 1 + rough * rms_one(uniform_filter1d(rng.standard_normal(n), size=30))
        tone = np.sin(2 * np.pi * np.cumsum(hz * bend) / SR)
        add(out, s, from_db(db + level_db) * flutter * np.hanning(n) * tone)
    return out + from_db(ring_db) * upper_air(out)


def above_lowest(x, size=512):
    """Splashing is thinned below the biggest bubble: a steep low cut that moves, block by block."""
    lowest_hz, = in_time(LOWEST_PITCH)
    out, state = np.zeros(N), np.zeros((2, 2))
    for i in range(0, N, size):
        k = np.tan(np.pi * lowest_hz[i] / SR)
        scale = 1 + np.sqrt(2) * k + k * k
        section = np.array([1, -2, 1, scale, 2 * (k * k - 1), 1 - np.sqrt(2) * k + k * k]) / scale
        out[i:i + size], state = signal.sosfilt([section, section], x[i:i + size] + 1e-18, zi=state)
    return out


def jar_air(x, width_hz, second_db, direct_db):
    """The shortening air column rings at two resonances; some of the splash comes straight out."""
    first = glide(x, in_time(AIR_COLUMN)[0], width_hz)
    second = from_db(second_db) * upper_air(x)
    return first - second + from_db(direct_db) * colour(x, SPLAT_SPECTRUM)


def upper_air(x):
    """The second resonance of the air column, which climbs and broadens overall as the jar fills."""
    first, second = in_time(AIR_COLUMN)
    return glide(x, second, SECOND_WIDTH_HZ * (first / first[0]) ** WIDENING)


def across(x, direct_db):
    """Bright sounds bounce between the glass walls on their way out, ringing fixed resonances."""
    modes = sum(from_db(db) * resonate(x, hz, width)[0] for hz, width, db in ACROSS_MODES)
    return from_db(direct_db) * x + modes


def glass(x):
    """Splashing rings the glass wall faintly; the last thread of sauce keeps its lowest mode going."""
    thread = from_db(THREAD_DB) * rng.standard_normal(N)
    thread = thread * between(TRICKLE_LEVEL[0][0], POUR_TO_S, 0.02)
    out = np.zeros(N)
    for (hz, db, t60), drive in zip(GLASS_MODES, (x + thread, x)):
        out += from_db(db) * resonate(drive, hz, np.log(1000) / (np.pi * t60))[0]
    return out


def ports(x):
    """The two ports hear the jar with a level and phase difference that depends on frequency."""
    hz, balance_db, lead = np.transpose(PORT_DIFFERENCES)
    ratio = from_db(np.interp(FREQS, hz, balance_db))
    step = np.gradient(np.interp(FREQS, hz, lead))
    # in each band the later port is delayed
    lag = np.cumsum(np.maximum([-step, step], 0), axis=1)
    balance = np.array([ratio, np.ones_like(ratio)]) * np.sqrt(2 / (1 + ratio ** 2))
    return irfft(rfft(x, SIZE) * balance * np.exp(-1j * lag), SIZE)[:, :N]


def kitchen(x, first_echo_s, left_db):
    """Diffuse reflections from hard walls: a decaying noise tail, different at each port."""
    t = TIME[:SR // 2]
    decay = from_db(-60 * t / KITCHEN_T60_S) * np.clip(t / first_echo_s - 1, 0, 1)
    tail = rng.standard_normal((2, len(t))) * decay
    tail = rms_one(tail) / np.sqrt(len(t)) * from_db([[left_db], [0]])
    return irfft(rfft(x, SIZE) * rfft(tail, SIZE) * gains(WALL_GAINS), SIZE)[:, :N]


def background(points):
    """Steady noise whose lows are nearly the same at both ports and whose highs are wide; rms 1."""
    mid, side = colour(rng.standard_normal((2, N)), points)
    side = irfft(rfft(side, SIZE) * gains(BACKGROUND_WIDTH), SIZE)[:N]
    return rms_one(mid + side * [[1], [-1]])


def ambience(tones_db, quiet_db):
    """Hum at first, rumble at the end, and very faint room noise under the pour."""
    tones = np.zeros(N)
    for hz, db in HUM_TONES:
        tone = np.sin(2 * np.pi * (hz * TIME + rng.random()))
        tones += np.sqrt(2) * from_db(db + tones_db) * tone
    rush = from_db(HUM_DB) * background(HUM_SPECTRUM)
    hum = (tones + rush) * between(-1, 0.2163, 0.0089)
    rumble = from_db(RUMBLE_DB) * background(RUMBLE_SPECTRUM) * between(7.46, 9, 0.015)
    quiet = from_db(quiet_db) * background(RUMBLE_SPECTRUM) * between(POUR_FROM_S, POUR_TO_S, 0.009)
    return hum + rumble + quiet


def scene():
    """The pour, close up, in its kitchen."""
    pour = stream(stir_db=2.5, fold_db=1.0, slosh_db=-5.5, gurgle_db=-4.0,
                  wash_db=-8.5, splatter_db=-19.0, spray_db=-1.5)
    sliding = slide(hiss_db=-17.0, seethe_db=-20.0, ring_db=-21.0)
    pour = pour + above_lowest(trickle(width_hz=460) + sliding)
    pour = pour + plops(level_db=-1.0, thud_db=10.5, tick_db=-29.5, ring_db=-17.5, upper_db=-28.0,
                        attack=0.92, damping=1.48, rise=0.0067)
    pour = pour + blips(low=0.45, high=1.35, spread_db=8.5)
    pour = pour + lumps(level_db=-1.0, length_s=0.0058)
    pour = pour + pops(snap_db=-8.5, ring_db=-2.0, whistle_db=-4.0, whistle_width_hz=230)
    pour = pour + squeaks(level_db=-4.0, rough=0.37, ring_db=-15.5)
    wall = glass(pour) * from_db([[1.5], [-1.5]])   # a little louder on the left
    room = kitchen(pour, first_echo_s=0.0033, left_db=1.5)
    return ports(pour) + wall + room + ambience(tones_db=-1.0, quiet_db=-100.0)


def record(dry):
    """The top is cut steeply by an elliptic low-pass."""
    return signal.sosfilt(signal.ellip(10, .1, 80, CUTOFF_HZ, fs=SR, output="sos"), dry)


dry = scene()
out = record(dry)
store_pcm(out)
```